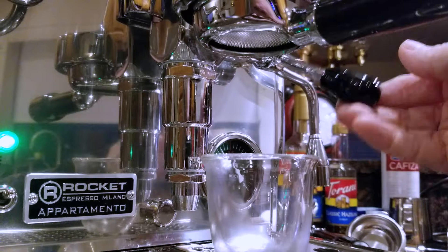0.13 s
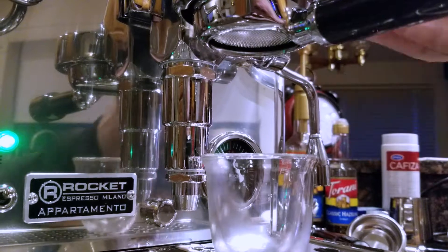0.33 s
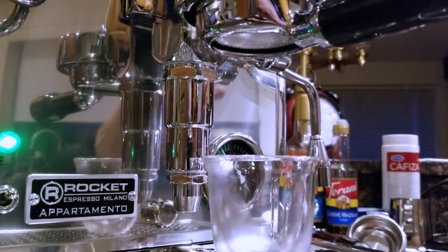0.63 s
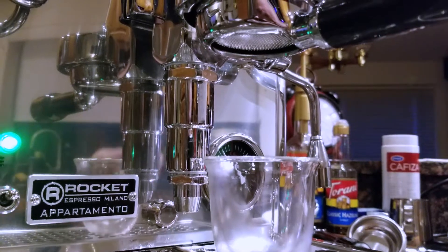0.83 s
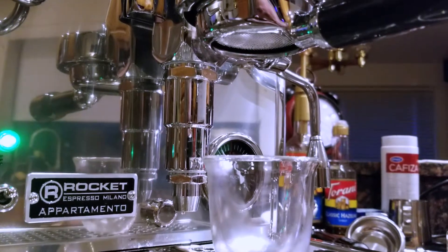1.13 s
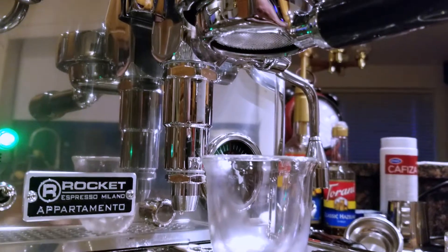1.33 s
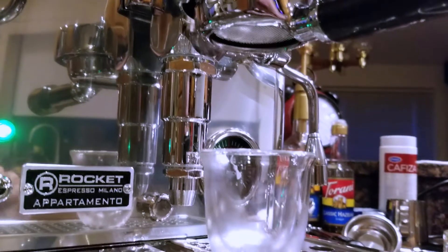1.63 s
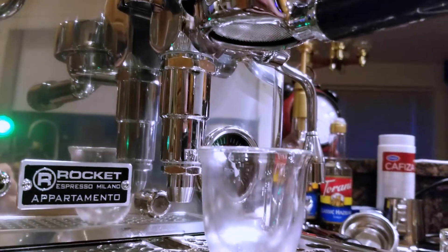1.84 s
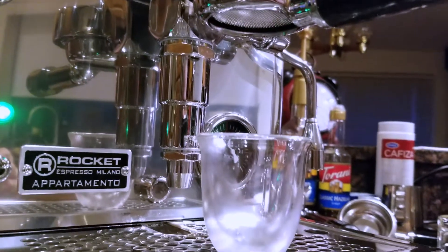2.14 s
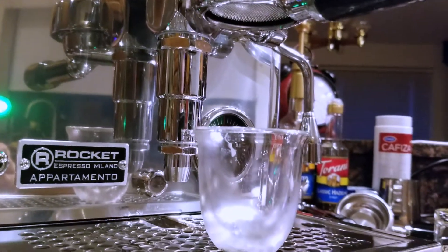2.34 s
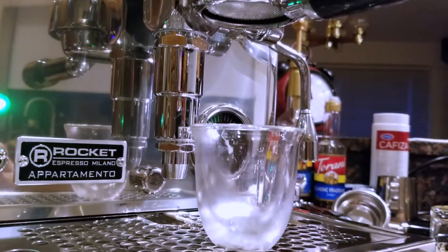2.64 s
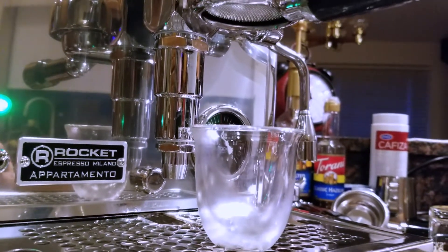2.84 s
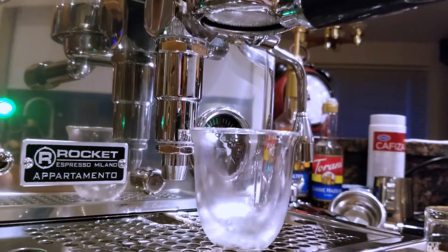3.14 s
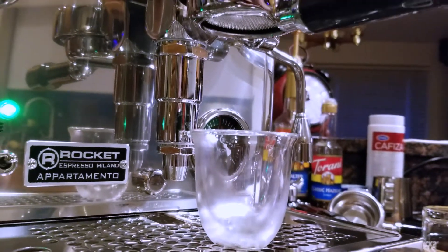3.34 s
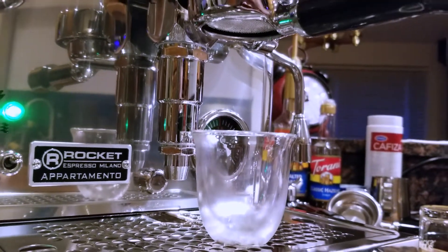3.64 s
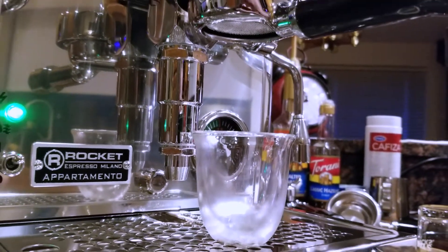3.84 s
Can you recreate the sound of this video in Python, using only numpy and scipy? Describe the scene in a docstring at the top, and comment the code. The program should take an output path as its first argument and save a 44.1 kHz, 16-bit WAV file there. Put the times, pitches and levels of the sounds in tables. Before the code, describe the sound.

Steady buzzing hum of an espresso machine, started by a lever's click and soft thud.

```python
"""Espresso machine starting in a kitchen

The brew lever rubs, clicks and thuds against its stop; a valve snaps, the vibratory pump starts
and a pipe ticks. The piston, stroking at mains rate, forces the steel case into vibration: it hums
(loudest at five times that rate), buzzes and rattles, and each stroke squirts a burst of hiss.
As pressure builds, the hum shifts from the case's boom to its other harmonics."""
import sys
import numpy as np
from scipy import signal
from scipy.fft import rfft, irfft
from scipy.io import wavfile

SR = 44100
rng = np.random.default_rng(int(sys.argv[2]) if len(sys.argv) > 2 else 0)


def unload_audio(sound):
    """Save the sound as a 16-bit wav file, at the path given as the first command line argument."""
    columns = np.transpose(np.atleast_2d(sound))
    # keep every value between -1 and 1, then stretch to whole-number steps
    steps = np.round(np.clip(columns, -1, 1) * 32767)
    wavfile.write(sys.argv[1], SR, steps.astype(np.int16))


N = 176400
T = np.arange(N) / SR
STROKE_HZ, PUMP_ON_S = 60.017, 0.383
STROKE_RAD = 2 * np.pi * STROKE_HZ * T


def from_db(db):
    """Amplitude ratio of a level."""
    return 10 ** (np.asarray(db) / 20)


def unit_rms(x):
    """Normalisation to rms 1."""
    return x / np.sqrt(np.mean(x ** 2) + 1e-20)


def in_time(rows):
    """Linear interpolation in time."""
    return np.interp(T, *np.transpose(rows))


def at_hz(points, hz):
    """Interpolation in log frequency."""
    f, value = np.transpose(points)
    return np.interp(np.log(hz + 1), np.log(f), value)


def pan(db):
    """Stereo gains for a left-right level difference."""
    return from_db(np.array([[db], [-db]]) / 2)


def decay(age, t60):
    """Exponential damping: 60 dB in t60 seconds."""
    return from_db(-60 * age / t60)


def run_up(rise_s):
    """Linear onset of the pump."""
    return np.clip((T - PUMP_ON_S) / rise_s, 0, 1)


def drift(corner_hz):
    """Random fluctuation: low-passed noise of rms 1."""
    hz = np.fft.rfftfreq(N // 10, 10 / SR)
    slow = irfft(rfft(rng.standard_normal(N // 10)) / (1 + (hz / corner_hz) ** 2))
    return np.interp(T, T[::10], unit_rms(slow))


# Left-right correlation of the sound field: f/Hz, coefficient
CORRELATION = [(60, 0.54), (300, 1), (600, 0.71), (1200, 0.081), (2300, 0.22), (5000, -0.098),
               (15000, 0.14)]
def noise(gain_at):
    """Partially coherent stereo noise of rms 1, shaped by gain_at(hz)."""
    hz = np.fft.rfftfreq(N, 1 / SR)
    mid, side = rfft(rng.standard_normal((2, N)))
    alike = np.clip(at_hz(CORRELATION, hz), -1, 1)
    stereo = np.sqrt(1 + alike) * mid + np.sqrt(1 - alike) * side * [[1], [-1]]
    return unit_rms(irfft(gain_at(hz) * stereo, N))


def coloured(spectrum):
    """Filtered noise of rms 1; the table sets only its spectral shape."""
    return noise(lambda hz: from_db(at_hz(spectrum, hz)))


def struck(hits, modes, crack_db, crack_t60):
    """Impact excitation: each blow starts damped modes and a crack of noise."""
    out = np.zeros((2, N))
    for onset, db in hits:
        age = np.maximum(T - onset, 0)
        blow = from_db(crack_db) * decay(age, crack_t60) * rng.standard_normal((2, N))
        for hz, mode_db, t60 in modes:
            stereo_rad = (1 - at_hz(CORRELATION, hz)) * np.array([[1], [-1]]) * np.pi / 4
            blow += from_db(mode_db) * decay(age, t60) * np.sin(2 * np.pi * hz * age + stereo_rad)
        out += from_db(db) * blow * (age > 0)
    return out


def kitchen(direct, t60=0.3, reverb_db=-12):
    """Reverberation: diffuse reflections, modelled as decaying noise, join the direct sound."""
    response = rng.standard_normal((2, SR // 2)) * decay(T[:SR // 2], t60)
    response /= np.sqrt(np.sum(response ** 2, axis=1, keepdims=True))
    return direct + from_db(reverb_db) * signal.fftconvolve(direct, response, axes=1)[:, :N]


# Rubbing envelope: t/s, level/dB
RUB_LEVEL = [(.11, -125), (.118, -84), (.17, -82), (.205, -68.5), (.22, -75), (.24, -70), (.3, -60),
             (.36, -76), (.45, -95), (.6, -130)]
# Rubbing spectrum: f/Hz, level/dB
RUB_SPECTRUM = [(30, -37), (100, 0), (380, -5), (800, -9.5), (1300, -18.5), (2300, -14), (3500, -27.5),
                (12000, -26.5), (16000, -17.5)]
def lever_rub():
    """Friction noise as the hand turns the lever."""
    return from_db(in_time(RUB_LEVEL)) * coloured(RUB_SPECTRUM)


# Tick in the pipes: t/s, level/dB
PIPE_TICKS = [(.462, -51)]
# Pipe modes: f/Hz, relative level/dB, T60/s
PIPE_RING = [(3680, -8, .02), (4050, -9, .02), (4300, 3.5, 0.027), (4800, -5, 0.022)]
def pipe_tick():
    """Heavily damped free vibration of a pipe."""
    return struck(PIPE_TICKS, PIPE_RING, crack_db=-2, crack_t60=0.02)


# Snap of the valve: t/s, level/dB
VALVE_SNAPS = [(.3755, -52.5)]
# Valve modes: f/Hz, relative level/dB, T60/s
VALVE_RING = [(2272, 5, 0.059), (2480, -2, 0.053), (6150, -17, 0.037), (8000, -31, .03), (10960, -24, .025),
              (15200, -17, .03)]
def valve_snap():
    """Impulse response of the valve, which snaps as the pump starts."""
    return struck(VALVE_SNAPS, VALVE_RING, crack_db=-6, crack_t60=0.11)


# Blows to the body: t/s, level/dB
BODY_BLOWS = [(.292, -54.5), (.397, -48.5)]
# Body modes: f/Hz, relative level/dB, T60/s
BODY_RING = [(110, -2, 0.26), (165, -18, 0.072), (250, -6, 0.059), (413, -4, 0.074)]
def body_thuds():
    """Low modes, excited as the lever meets its stop and as the pump jolts into motion."""
    return struck(BODY_BLOWS, BODY_RING, crack_db=-30, crack_t60=0.05)


# Snaps of the lever's cam: t/s, level/dB
CAM_SNAPS = [(0.2313, -64), (0.265, -41.5)]
# Click spectrum: f/Hz, level/dB
CLICK_SPECTRUM = [(800, -22), (2700, -17), (3900, -30), (5400, -13), (5950, 4), (6600, -7), (7200, -14.5),
                  (8000, -6), (8800, -1), (9450, -22), (10200, 8), (11400, -6), (12200, -5), (13400, -14),
                  (14200, -17), (15400, -21)]
# Spectrum of its tail in the room: f/Hz, level/dB
TAIL_SPECTRUM = [(500, -2), (2800, 3), (4000, -4), (6000, 0), (8500, 6), (9500, -8), (11000, 2),
                 (13000, -2), (15800, -8)]
def cam_clicks(burst_t60=0.028, tail_t60=0.3, tail_db=-21):
    """Broadband transients: the cam snaps over in bright bursts with faint reverberant tails."""
    burst, tail = 0, 0
    for onset, db in CAM_SNAPS:
        age = np.maximum(T - onset, 0)
        burst += from_db(db) * (age > 0) * decay(age, burst_t60)
        tail += from_db(db + tail_db) * (age > 0) * decay(age, tail_t60)
    return burst * coloured(CLICK_SPECTRUM) + tail * coloured(TAIL_SPECTRUM)


# Lever modes: f/Hz, relative level/dB, T60/s
LEVER_RING = [(1430, -19.5, 0.12), (2780, -20, 0.07)]
def lever_ring():
    """Free vibration of the lever after each snap of its cam."""
    return struck(CAM_SNAPS, LEVER_RING, crack_db=-10, crack_t60=0.041)


# Spectral envelope of the piston's knock: f/Hz, level per harmonic/dB
KNOCK_SPECTRUM = [(1100, -90), (1400, -84), (1700, -78), (1900, -84.5), (1980, -69), (2100, -81),
                  (2220, -70), (2600, -87), (3000, -79)]
def piston_buzz():
    """A periodic knock has a line spectrum: high harmonics, each wavering in phase."""
    out = 0
    for k in range(19, 48):
        phase = k * STROKE_RAD + 2 * np.pi * rng.random((2, 1)) + 0.5 * drift(1)
        out += from_db(at_hz(KNOCK_SPECTRUM, k * STROKE_HZ)) * np.sin(phase)
    return np.sqrt(2) * out * run_up(rise_s=0.023)


# Narrow resonances of the steelwork: f/Hz, gain/dB
STEEL_RESONANCES = [(3660, 2.5), (5930, 4), (6416, 8), (7579, 8), (8225, 3.5), (9862, 9), (11412, 1),
                    (12403, -2), (12661, 0), (15400, 4)]
def steelwork(hz, half_width_hz=72, ripple_db=4.4):
    """Frequency response of the steel: a few resonances over a dense random ripple."""
    grid_hz = np.arange(0, SR / 2, 55.0)
    ripple = np.interp(hz, grid_hz, rng.standard_normal(len(grid_hz)))
    peaks_db = sum(db / (1 + ((hz - centre) / half_width_hz) ** 2) for centre, db in STEEL_RESONANCES)
    return from_db(ripple_db * ripple + peaks_db)


# Water jet spectrum: f/Hz, level/dB
WATER_SPECTRUM = [(1500, -7), (2800, 2), (3600, 3), (4300, 2), (5300, -0.5), (6300, 1), (7100, 0),
                  (7900, -2.5), (8700, -1.5), (9500, -4.5), (10700, 0.5), (12600, 0.5), (14300, -2),
                  (15800, -4.5)]
# Water jet envelope: t/s, level/dB
WATER_LEVEL = [(.4, -60), (.6, -59.5), (1.2, -59), (1.5, -57.5), (2.5, -58.5), (4, -58)]
# Spectrum of air driven out ahead of the water: f/Hz, level/dB
AIR_SPECTRUM = [(6000, -33), (10000, -27), (12300, 4.5), (14000, -1), (15600, 1.5)]
# Air envelope: t/s, level/dB
AIR_ENVELOPE = [(.4, -66), (.46, -57), (.75, -58), (1.04, -59.5), (1.12, -77), (1.5, -100)]
def jet_hiss(squirt_db=3.5, spread_db=1.6):
    """Pulsed flow noise: each stroke squirts water through the valve; at first air escapes too."""
    peak, rise, fall = 0.68, 0.11, 0.23  # fractions of a stroke
    cycle = STROKE_HZ * T - peak + 1 / 3
    offset = cycle % 1 - 1 / 3
    stroke = np.floor(cycle).astype(int) + 1
    strength = from_db(squirt_db + spread_db * rng.standard_normal(N)[stroke])
    squirt = np.where(offset < 0, np.exp(-(offset / rise) ** 2), np.exp(-np.abs(offset) / fall))
    flow = noise(lambda hz: from_db(at_hz(WATER_SPECTRUM, hz)) * steelwork(hz))
    water = from_db(in_time(WATER_LEVEL)) * flow * pan(db=1.1)
    air = from_db(in_time(AIR_ENVELOPE)) * coloured(AIR_SPECTRUM) * pan(db=4)
    pulsation = unit_rms((1 + strength * squirt) * from_db(0.4 * drift(970)))
    return (water + air) * pulsation * run_up(rise_s=0.0067)


# Chatter spectrum: f/Hz, level/dB
CHATTER_SPECTRUM = [(25, -6), (50, -14), (100, 4), (180, -9), (400, -4), (700, -1.5), (1000, 9.5),
                    (1180, 0.5), (1550, 6), (1900, 4), (2120, -1.5), (2250, 1), (2550, -3.5), (2900, -13.5),
                    (4000, -11), (8000, -19)]
# Chatter envelope: t/s, level/dB
CHATTER_LEVEL = [(.4, -54.5), (.75, -55), (1.0, -57), (1.25, -54.5), (1.5, -55), (1.95, -54), (2.15, -53),
                 (2.33, -52.5), (2.45, -56), (2.6, -51.5), (2.85, -57), (3.15, -56), (3.4, -54.5),
                 (3.75, -55.5), (4, -55.5)]
# Panel resonances: f/Hz, half-width/Hz, mean level/dB
PANEL_MODES = [(275, 64, -61.5), (313, 8.4, -58.5), (404, 75, -66), (589, 39, -63), (802, 13, -66.5),
               (900, 58, -60.5), (1280, 26, -71), (1624, 23, -70), (1953, 21, -71.5)]
def case_rattle(depth_db=3.5, width_strokes=0.22):
    """Contact noise: loose steel chatters once a stroke and keeps the panels resonating."""
    offset = (STROKE_HZ * T + 0.5) % 1 - 0.5
    pulse = np.exp(-(offset / width_strokes) ** 2)
    shake = unit_rms(from_db(depth_db * pulse + drift(6.7)))
    chatter = coloured(CHATTER_SPECTRUM) * shake
    panels = sum(from_db(db) * noise(lambda hz: 1 / (1 + ((hz - centre) / half_width) ** 2))
                 for centre, half_width, db in PANEL_MODES)
    level_db = in_time(CHATTER_LEVEL)
    rattle = from_db(level_db) * chatter + from_db(level_db - level_db.mean()) * panels
    return rattle * run_up(rise_s=0.023)


# Boom of the case on the fourth harmonic: t/s, level/dB
FOURTH_LEVEL = [(.4, -89), (1.05, -91), (1.2, -72), (1.45, -67), (1.6, -59.5), (1.85, -56.5), (2.05, -53.5),
                (2.22, -50.5), (2.36, -65), (2.55, -59), (2.8, -55), (3.3, -56), (4, -56)]
# Boom on the fifth harmonic: t/s, level/dB
FIFTH_LEVEL = [(0.46, -38.5), (0.68, -37.5), (1.09, -39.5), (1.18, -37), (1.93, -35), (2.04, -37),
               (2.16, -35.5), (2.6, -39.5), (2.64, -37), (2.71, -42), (3.67, -44.5), (3.97, -44.5)]
# Back pressure on the pump: t/s, fraction of full pressure
BACK_PRESSURE = [(.4, 0), (1.05, 0), (1.6, 0.01), (2.2, 0.68), (2.6, 0.8), (3.05, 1), (4, 1)]
# Other harmonics: number, free-flow level/dB, full-pressure level/dB, pressure exponent, left-right/dB
HARMONICS = [(1, -63.5, -77, 4, 5.5), (2, -60.5, -55.5, 12, -0.5), (3, -61.5, -56, 0.17, 0.5),
             (6, -62.5, -70, 2.4, -3), (7, -61.5, -63, 3, 3.5), (8, -67.5, -77.5, 3, -1),
             (9, -65.5, -67, 2.3, -4), (10, -72.5, -60.5, 0.67, 3.5), (11, -65.5, -68, 6, 3),
             (12, -72, -75.5, 1, -6), (13, -61, -59.5, 0.68, -12), (14, -71.5, -83.5, 0.33, -23),
             (15, -57, -57, 1, 3.5), (16, -69, -67, 0.35, -21.5), (17, -76, -78.5, 1.1, -10),
             (18, -80, -74.5, 0.66, 14), (21, -77.5, -70.5, 0.26, 2), (22, -67.5, -69, 6, 8),
             (25, -70, -68.5, 2, -1), (26, -72, -72.5, 1, 4)]
def case_hum():
    """Forced vibration at harmonics of the stroke rate; back pressure shifts their balance."""
    pressure = np.clip(in_time(BACK_PRESSURE), 1e-6, 1)
    left_lead_rad = np.array([[0.34], [0]])
    out = pan(db=2.5) * from_db(in_time(FIFTH_LEVEL) + 0.7 * drift(13)) * np.sin(5 * STROKE_RAD)
    out += pan(db=-3) * from_db(in_time(FOURTH_LEVEL)) * np.sin(4 * STROKE_RAD)
    for k, free_db, full_db, exponent, pan_db in HARMONICS:
        khz = k * STROKE_HZ / 1000
        level_db = free_db + (full_db - free_db) * pressure ** exponent
        waver_db = (0.5 + 0.98 * khz) * drift(8.4)  # higher harmonics waver more
        phase = k * STROKE_RAD + 2 * np.pi * rng.random() + 0.18 * khz * drift(2.2)
        out += pan(pan_db) * from_db(level_db + waver_db) * np.sin(phase + left_lead_rad)
    return np.sqrt(2) * out * run_up(rise_s=0.061)


def scene():
    """Superposition of the starting transients and the running pump."""
    knocks = lever_ring() + body_thuds() + valve_snap() + pipe_tick()
    start = kitchen(knocks) + cam_clicks() + lever_rub()
    return start + case_hum() + piston_buzz() + case_rattle() + jet_hiss()


def record(dry):
    """Band limiting by a steep elliptic low-pass filter."""
    cutoff_hz = 15750
    return signal.sosfilt(signal.ellip(12, 0.1, 80, cutoff_hz, fs=SR, output="sos"), dry)


dry = scene()
out = record(dry)
unload_audio(out)
```